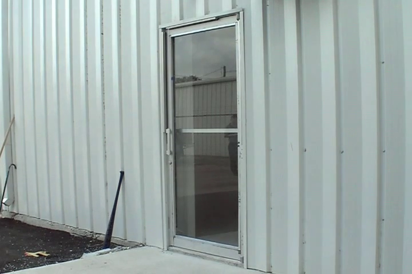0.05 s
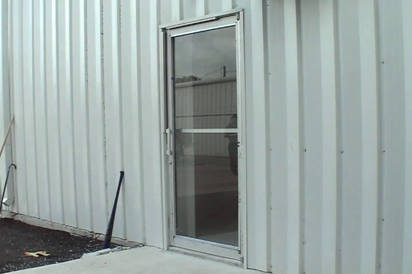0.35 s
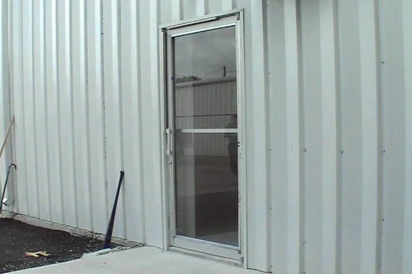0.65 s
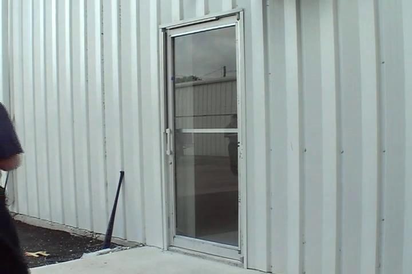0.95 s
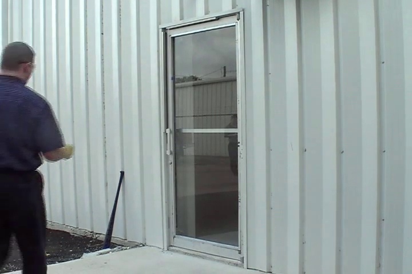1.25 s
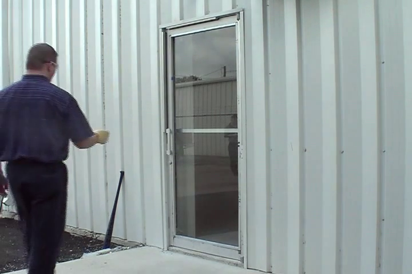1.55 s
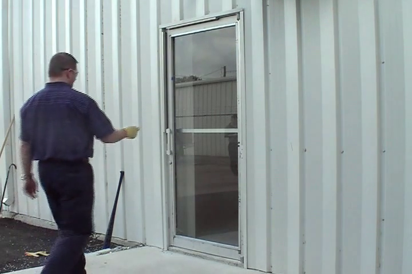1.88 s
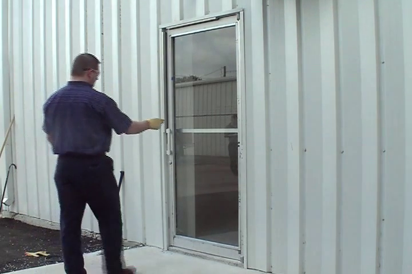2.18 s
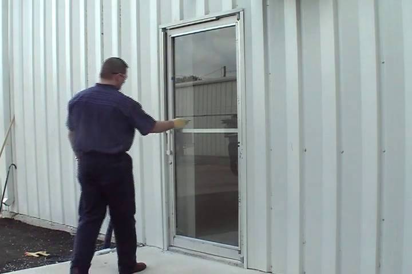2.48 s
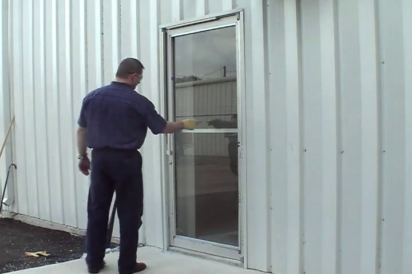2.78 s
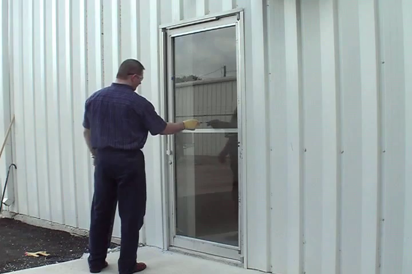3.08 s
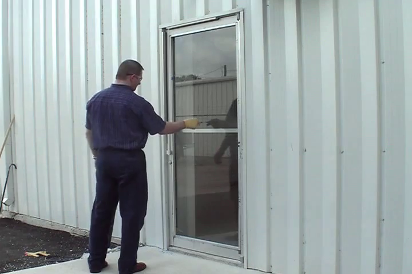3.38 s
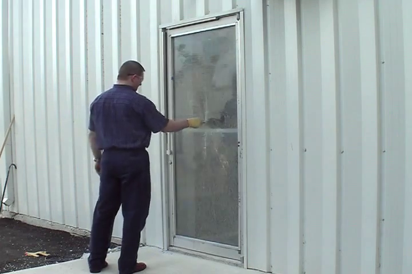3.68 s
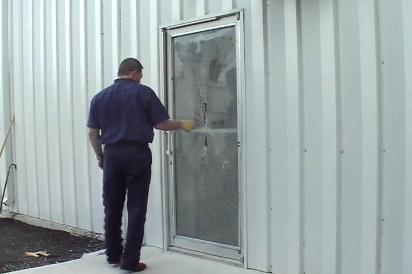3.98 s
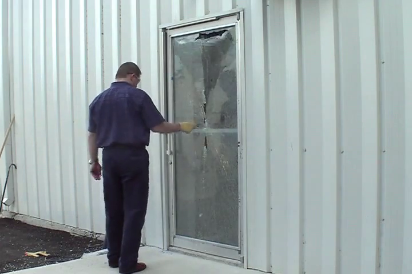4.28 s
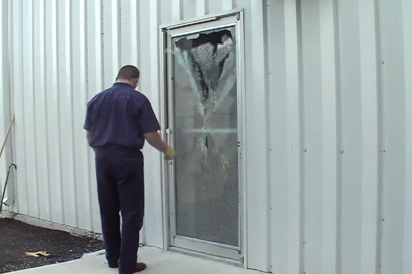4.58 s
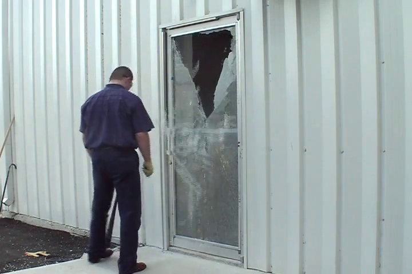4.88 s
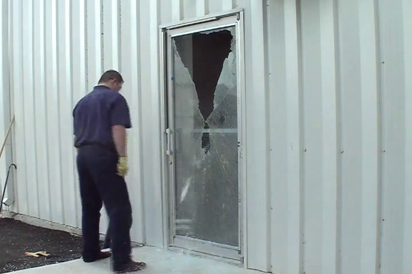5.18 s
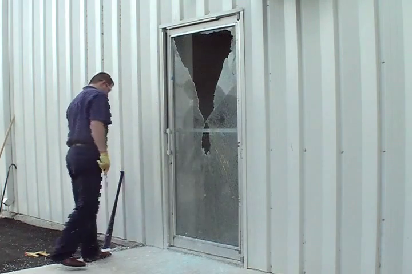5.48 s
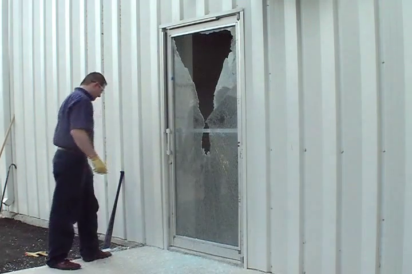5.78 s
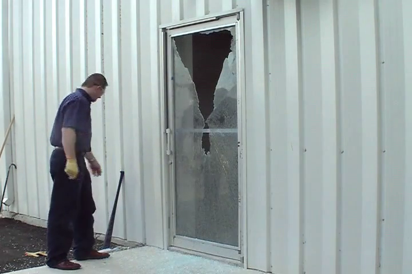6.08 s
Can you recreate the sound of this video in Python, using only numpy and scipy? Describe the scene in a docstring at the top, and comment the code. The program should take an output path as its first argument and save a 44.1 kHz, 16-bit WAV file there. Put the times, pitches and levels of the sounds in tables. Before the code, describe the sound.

Distant traffic and a wavering engine hum faintly in an open yard. Shoes scuff softly on grit, and a tool scratches briefly against a glass door. The pane bursts with a sharp bang that overloads the microphone, the door booming as the cracked glass crackles. Slabs and crumbs then pour onto concrete, clacking and tinkling for about two seconds. A sole slides quietly as the fall thins out.

```python
"""Distant traffic and an engine hum fill a yard. A man walks up to a tempered glass door in a
sheet-metal wall and, at 3.2 s, presses a punch against the pane. At 3.8 s the pane bursts with a
bang that overloads the microphone; the door booms and the cracked glass crackles. Then slabs of
glass crumbs let go and shower onto the concrete, clacking and tinkling. Near 6 s his sole slides
as he steps away."""
import sys
import numpy as np
from scipy import signal
from scipy.fft import rfft, irfft
from scipy.io import wavfile

SR = 44100
rng = np.random.default_rng(int(sys.argv[2]) if len(sys.argv) > 2 else 0)


def master_out(mix):
    """Clip the mix to full scale and print it as 16-bit PCM to the path in sys.argv[1]."""
    frames = np.transpose(np.atleast_2d(mix))
    ceiling = np.clip(frames, -1, 1)
    pcm = np.round(ceiling * 32767).astype(np.int16)
    wavfile.write(sys.argv[1], SR, pcm)


N = 275625
TIME = np.arange(N) / SR
CUTOFF_HZ = 16700


def from_db(db):
    """Turn decibels (dB) into a number to multiply by."""
    return 10 ** (np.asarray(db) / 20)


def gains(rows):
    """Join rows of a time and levels in dB into loudness curves, silent before the first row."""
    times, *columns = np.transpose(rows)
    return [from_db(np.interp(TIME, times, db)) * (TIME >= times[0]) for db in columns]


def drift(turns_per_s):
    """A slow random wobble, about 1 in size."""
    points = rng.standard_normal(4000)
    return np.interp(TIME * turns_per_s, np.arange(len(points)), points) / np.sqrt(2 / 3)


def colour(x, spectrum, size=4096):
    """Make some pitches stronger and others weaker; white noise keeps its power."""
    hz, level_db = np.transpose(spectrum)
    bins = np.maximum(np.arange(size // 2 + 1) * SR / size, 1)
    curve = from_db(np.interp(np.log(bins), np.log(hz), level_db))
    # build the filter so that nothing sounds ahead of a click
    cepstrum = irfft(np.log(curve))
    cepstrum[1:size // 2] *= 2
    cepstrum[size // 2 + 1:] = 0
    pulse = irfft(np.exp(rfft(cepstrum)))
    return signal.oaconvolve(x, pulse / np.linalg.norm(pulse))[:N]


def ring(clicks, hz, ring_s):
    """Each click starts a tone of its own height; the ring time is how long it takes to fade 60 dB."""
    fade, turn = from_db(-60 / (ring_s * SR)), 2 * np.pi * hz / SR
    return signal.lfilter([0, np.sin(turn)], [1, -2 * fade * np.cos(turn), fade * fade], clicks + 1e-18)


def strike_tones(clicks, tones, wander_db=0):
    """Each click strikes each tone with a random strength; wander shifts which tones are favoured."""
    out = 0
    for hz, db, ring_s in tones:
        strength = rng.standard_normal(N) * from_db(db + wander_db * np.minimum(drift(35), 1.5))
        keep_energy = np.sqrt(4 * np.log(1000) / (ring_s * SR))
        out = out + ring(clicks * strength, hz, ring_s) * keep_energy
    return out


def grains(per_s, spread_db):
    """Random clicks of uneven size, with an average power of 1."""
    sizes = from_db(spread_db * np.minimum(rng.exponential(1, N), 3))
    clicks = sizes * rng.choice([-1, 1], N) * (rng.random(N) < per_s / SR)
    return clicks / np.sqrt(np.mean(clicks ** 2) + 1e-20)


def flurries(rows, rise_s=0.00029):
    """A loudness curve of events that swell in a moment and die away; their powers add."""
    power = np.zeros(N)
    for start, db, fade_s in rows:
        at = round(start * SR)
        age = TIME[:min(SR // 4, N - at)]
        shape = (1 - np.exp(-age / rise_s)) * np.exp(-age / fade_s)
        power[at:at + len(age)] += (from_db(db) * shape) ** 2
    return np.sqrt(power)


def pings(rows):
    """Pure tones that start at once and die away."""
    out = np.zeros(N)
    for start, hz, db, ring_s in rows:
        at = round(start * SR)
        age = TIME[:min(int(ring_s * SR), N - at)]
        out[at:at + len(age)] += from_db(db - 60 * age / ring_s) * np.sin(2 * np.pi * hz * age)
    return out


def stereo_noise(spectrum, side_db):
    """Steady noise: a shared part, plus a side part added on the left and taken away on the right."""
    shared, side = (colour(rng.standard_normal(N), spectrum) for _ in range(2))
    return shared + from_db(side_db) * side * [[1], [-1]]


# Tone colours of the traffic and the hiss. Each row: pitch in Hz, relative level in dB.
TRAFFIC_COLOUR = [(20, -16), (40, -13.5), (60, -4), (100, -2.5), (170, -4.5), (250, -9), (350, -10.5),
                  (520, -8), (850, -9.5), (1400, -14), (2500, -21), (4500, -29.5), (7000, -32.5),
                  (16000, -64)]
HISS_COLOUR = [(2000, -19), (5500, -2.5), (7700, -9), (8700, 9), (9400, 6), (11300, -16), (13000, -8),
               (16000, -22)]
# A distant engine changing gear. Each row: time in seconds, pitch in Hz, level in dB.
ENGINE_NOTE = [(0, 123.9, -57), (1.9, 117.4, -54), (2.55, 120.9, -47.5), (3.85, 123.1, -55),
               (4.05, 92, -43.5), (4.5, 93.1, -53.5), (5.02, 107.7, -45.5), (5.2, 110, -68)]
def background():
    """Far traffic rumbles, an engine note wavers and the microphone hisses."""
    times, hz, db = np.transpose(ENGINE_NOTE)
    pitch = np.interp(TIME, times, hz) + 2.54 * drift(6.8)
    loudness = from_db(np.interp(TIME, times, db) + 1.6 * drift(9.8))
    engine = loudness * np.sin(2 * np.pi * np.cumsum(pitch) / SR)
    traffic = from_db(-48.5) * stereo_noise(TRAFFIC_COLOUR, side_db=-15)
    hiss = from_db(-60.5) * stereo_noise(HISS_COLOUR, side_db=1.5)
    return traffic + engine + hiss


def dying_noise(fade_s, channels):
    """A second of fading noise, like many tiny echoes blurred together."""
    age = TIME[:SR]
    noise = rng.standard_normal((channels, SR)) * np.exp(-age / fade_s) * (age > .002)
    return noise / np.linalg.norm(noise, axis=-1, keepdims=True)


# The echo off the building opposite. Each row: delay in seconds, level in dB.
BUILDING_ECHOES = [(0.062, -19)]
def yard(x, tail_db, tail_ring_s, treble_cut_hz, scatter_db, scatter_s):
    """Add an open-air tail, scatter off the ribbed wall that differs at each ear, and an echo."""
    fade_s = tail_ring_s / np.log(1000)
    tail = dying_noise(fade_s, channels=1) + dying_noise(fade_s, channels=2)
    tail = signal.sosfilt(signal.butter(1, treble_cut_hz, fs=SR, output="sos"), tail)
    response = from_db(tail_db) * tail + from_db(scatter_db) * dying_noise(scatter_s, channels=2)
    response[:, 0] += 1  # the direct sound
    for delay, db in BUILDING_ECHOES:
        response[:, round(delay * SR)] += from_db(db)
    return signal.oaconvolve(x, response, axes=-1)[:, :N]


# Shoes scuff grit, heel and sole land, and the punch touches the glass.
# Each row: start in seconds, level in dB, fade time in seconds.
SHOE_SCUFFS = [(1.289, -43, 0.016), (1.68, -53, 0.017), (2.025, -46.5, .01), (2.74, -47, 0.027)]
SHOE_LANDINGS = [(1.28, -42, 0.0091), (1.379, -43, 0.007)]
PUNCH_TOUCHES = [(3.1603, -32, 0.0095), (3.1635, -35.5, 0.015), (3.202, -45, 0.0084)]
# A sole slides on the concrete. Each row: time in seconds, level in dB.
SOLE_SLIDE = [(5.95, -49.5), (6.08, -47), (6.14, -45), (6.2, -44), (6.25, -46)]
# Tone colours of those four sounds. Each row: pitch in Hz, relative level in dB.
SCUFF_COLOUR = [(200, -2), (1200, 3), (2500, 1), (9000, 0), (11000, -6), (16000, -10)]
STEP_COLOUR = [(150, -8), (900, 3), (3500, -5), (6000, -18), (16000, -35)]
PUNCH_COLOUR = [(500, -29), (1900, -18), (2800, -4), (4000, -3), (7000, -5.5), (9000, -16), (16000, -27)]
SLIDE_COLOUR = [(100, -8), (400, -6), (900, -0.5), (1300, -2.5), (2000, -16), (8000, -23)]
def man():
    """His shoes crunch on grit, his punch scratches the pane, and a sole slides as he steps away."""
    grit = grains(per_s=5000, spread_db=2)
    scuffs = colour(flurries(SHOE_SCUFFS) * grit, SCUFF_COLOUR)
    step = colour(flurries(SHOE_LANDINGS) * grit, STEP_COLOUR)
    punch = colour(flurries(PUNCH_TOUCHES) * grains(per_s=14000, spread_db=1.5), PUNCH_COLOUR)
    slide = colour(gains(SOLE_SLIDE)[0] * rng.standard_normal(N), SLIDE_COLOUR)
    return scuffs + step + punch + slide


# The door swings in its frame. Each row: start in seconds, level in dB.
FRAME_KNOCKS = [(3.834, -22.5), (3.896, 1.5)]
# Tones of the door and wall. Each row: pitch in Hz, level in dB, ring time in seconds.
DOOR_TONES = [(55.8, -38.5, 1), (91, -38, 0.8), (116.5, -41, 0.85), (164.7, -44.5, 0.58), (209, -38, 0.3),
              (483, -44, 0.38)]
def door():
    """The stress let out of the glass shakes the frame and the wall sheets, which boom."""
    knocks = np.zeros(N)
    for start, db in FRAME_KNOCKS:
        knocks[round(start * SR)] = from_db(db)
    return sum(from_db(db) * ring(knocks, hz, ring_s) for hz, db, ring_s in DOOR_TONES)


# Loose crumbs: a first fall from the top of the pane, a lull, then the main fall.
# Each row: time in seconds, level of bright crumbs in dB, level of dull clatter in dB.
CRUMB_FLOW = [(4.36, -48.5, -50.5), (4.42, -34.5, -38), (4.68, -31, -37), (4.79, -28.5, -33.5),
              (5.0, -31, -39.5), (5.1, -30.5, -30.5), (5.24, -21.5, -31), (5.55, -29, -31.5),
              (5.72, -35, -42), (6.03, -34, -41), (6.16, -45, -58)]
BREAK_UP_S = 0.01  # fade time of a crumbling lump or slab
def shower(lumps_per_s=60, lump_spread_db=3, trickle_db=-4.5):
    """Bright and dull loudness curves of loose glass: an even trickle with small lumps at random."""
    slots = np.arange(CRUMB_FLOW[0][0], N / SR - .05, 1 / lumps_per_s)
    lateness, size = rng.random((1000, 2))[:len(slots)].T
    starts = slots + lateness / lumps_per_s
    levels = lump_spread_db * (2 * size - 1)
    lumps = flurries((start, db, BREAK_UP_S) for start, db in zip(starts, levels))
    return gains(CRUMB_FLOW) * np.hypot(from_db(trickle_db), lumps)


def tinkle(loudness, count, centre_hz, octaves, level_db, ring_s):
    """Pieces ring at random, more often when the fall is loud, each at a pitch set by its size."""
    chance = np.sqrt(loudness)
    at = rng.choice(N, count, p=chance / chance.sum())
    size, force, damping = rng.standard_normal((count, 3)).T
    hz = np.minimum(centre_hz * 2 ** (octaves * size), CUTOFF_HZ)
    blow_db = np.minimum(20 * np.log10(loudness[at]), -22)  # one piece takes only so much of a blow
    db = blow_db + level_db + 4 * np.minimum(force, 2)
    return pings(zip(at / SR, hz, db, ring_s * 2 ** (.5 * damping)))


# Tone colour of a crumb's tick. Each row: pitch in Hz, relative level in dB.
TICK_COLOUR = [(500, -16.5), (2500, -11.5), (4000, -6.5), (4700, -6), (6500, -3.5), (8000, 1), (9500, -1.5),
               (11300, -10.5), (16000, -21)]
# High ringing tones that colour each tick of falling glass.
# Each row: pitch in Hz, level in dB, ring time in seconds.
HIGH_RING_TONES = [(7380, -15, .04), (7810, -11, .035), (8650, -13, .03), (9110, -7, .05),
                   (9570, -12, .045), (10020, -17, .04), (13000, -24, .025)]
def crumbs(clicks, tick_db):
    """Little glass cubes tick at each contact, and a high ring colours each tick."""
    ticks = from_db(tick_db) * colour(clicks, TICK_COLOUR)
    return ticks + from_db(-2.5) * strike_tones(clicks, HIGH_RING_TONES, wander_db=4)


# Tone colour of a clack. Each row: pitch in Hz, relative level in dB.
CLACK_COLOUR = [(60, -25.5), (600, -15.5), (1100, -2), (1800, 3), (3500, 0.5), (4500, 0.5), (16000, -10)]
# Tones of a slab hitting the step. Each row: pitch in Hz, level in dB, ring time in seconds.
SLAB_TONES = [(1717, -8.5, 0.01), (2615, -14, 0.019), (2960, -10.5, 0.008), (3200, -16, 0.052),
              (4080, -14, 0.034)]
def clacks(knocks):
    """Bigger pieces land with a dull knock and a short ring."""
    hits = from_db(-3) * colour(knocks, CLACK_COLOUR)
    return hits + from_db(-2.5) * strike_tones(knocks, SLAB_TONES, wander_db=6.5)


# Slabs that snap off or land and break up, and pieces that land whole with one sharp hit.
# Each row: start in seconds, level of the bright part in dB, level of the dull clack in dB.
BREAKING_SLABS = [(3.895, -30, -25), (3.917, -36, -22), (4.081, -45, -25.5), (4.1153, -26.5, -17),
                  (4.284, -35, -35), (4.36, -21, -29.5), (4.3793, -19.5, -17), (4.4078, -18.5, -16.5),
                  (4.4636, -17, -23), (4.5196, -14, -27.5), (4.561, -16, -30.5), (4.575, -15.5, -23.5),
                  (4.634, -16, -24), (4.6938, -11, -18.5), (4.7507, -12, -29), (4.795, -16, -31),
                  (4.8755, -20, -28), (4.97, -29, -24), (5.026, -19.5, -17.5), (5.148, -16, -19.5),
                  (5.179, -14.5, -19.5), (5.2861, -23.5, -14), (5.3327, -15, -24.5), (5.4305, -15, -29),
                  (5.461, -16, -27), (5.5003, -13, -26), (5.522, -19.5, -21.5), (5.5579, -18.5, -21),
                  (5.589, -14, -25.5), (5.7428, -19.5, -35.5), (5.827, -19.5, -31.5), (5.8849, -13, -25.5),
                  (5.9755, -22, -28.5), (6.036, -25, -37.5)]
WHOLE_PIECES = [(4.545, -10, -28), (5.042, -8, -1), (5.662, -9, -26.5), (5.8748, -9.5, -26),
                (6.003, -17, -37), (6.1862, -15.5, -30.5)]
# Single shards ring out. Each row: start in seconds, pitch in Hz, level in dB, ring time in seconds.
SHARD_RINGS = [(4.757, 9000, -22, 0.16), (5.464, 9101, -14, 0.078), (5.935, 8498, -50, 0.2),
               (6.205, 9273, -38.5, 0.78)]
def falling_glass(sharp_hit_s=.0028):
    """Each slab clacks and breaks into a flurry of crumbs; loose crumbs rain down in between."""
    hits = [(*row, BREAK_UP_S) for row in BREAKING_SLABS] + [(*row, sharp_hit_s) for row in WHOLE_PIECES]
    bright = flurries((start, db, fade_s) for start, db, _, fade_s in hits)
    dull = flurries((start, db, fade_s) for start, _, db, fade_s in hits)
    loose_bright, loose_dull = shower()
    # hard landings ring more, and tick less, than the trickle
    landings = crumbs(bright * grains(per_s=6000, spread_db=2.5), tick_db=-3)
    trickle = from_db(-1) * crumbs(loose_bright * grains(per_s=3000, spread_db=3.2), tick_db=3)
    knocks = dull * grains(per_s=7000, spread_db=2) + loose_dull * grains(per_s=2500, spread_db=2.5)
    clatter = clacks(knocks)
    all_bright, all_dull = np.hypot(bright, loose_bright), np.hypot(dull, loose_dull)
    small = tinkle(all_bright, count=300, centre_hz=8600, octaves=.16, level_db=-5.5, ring_s=.06)
    large = tinkle(all_dull, count=300, centre_hz=2900, octaves=.5, level_db=-4, ring_s=.035)
    return landings + trickle + clatter + small + large + pings(SHARD_RINGS)


# The pane lets go. Each row: start in seconds, level in dB, fade time in seconds.
PANE_BURST = [(3.8322, -17, 0.0017), (3.8343, 3, 0.0063)]
# Cracking dies out in a quick rush and a slow settling. Each row: first level in dB, dB lost a second.
CRACKLE_STAGES = [(-27, 117), (-32, 31)]
# Tone colours of the bang and the crackle. Each row: pitch in Hz, relative level in dB.
BANG_COLOUR = [(100, -30.5), (450, -43.5), (950, 4.5), (1600, 5.5), (2600, 5), (3400, -2), (5000, -2),
               (8800, 0.5), (11000, -9.5), (16000, -32)]
CRACKLE_COLOUR = [(150, -2.5), (550, -6.5), (750, -2), (1800, -5), (2600, -1), (4700, -9), (8000, -5),
                  (11000, -12.5), (16000, -25)]
# Tones of the framed pane. Each row: pitch in Hz, level in dB, ring time in seconds.
PANE_TONES = [(735, -19.5, 0.081), (1040, -12, 0.064), (1583, -2.5, 0.029), (1900, -9, 0.11)]
def bursting_pane():
    """Cracks race across the pane within milliseconds, then thin out to a crackle."""
    bang = flurries(PANE_BURST) * grains(per_s=18000, spread_db=-2.5)
    let_go = PANE_BURST[-1][0]
    age = TIME - let_go
    power = sum(from_db(db - fall * np.abs(age)) ** 2 for db, fall in CRACKLE_STAGES) * (age > 0)
    crackle = np.sqrt(power) * grains(per_s=5500, spread_db=3)
    cracks = from_db(-1) * colour(bang, BANG_COLOUR) + from_db(3) * colour(crackle, CRACKLE_COLOUR)
    # the released stress sets the pane ringing, and so does each later crack
    kick = pings((let_go, hz, db - .5, ring_s) for hz, db, ring_s in PANE_TONES)
    return cracks + kick + from_db(-7.5) * strike_tones(crackle, PANE_TONES)


def scene():
    """The action at the door echoes round the yard; the right channel is the louder."""
    pane = bursting_pane() * from_db([[-1], [.8]])
    others = (door() + falling_glass() + man()) * from_db([[-3.1], [1.4]])
    near = yard(pane + others, tail_db=-16, tail_ring_s=.8, treble_cut_hz=7000,
                scatter_db=-10, scatter_s=.004)
    return near + background() * from_db([[-3.2], [2.3]])


def limiter(x, threshold_db, attack_s, release_db_per_s):
    """Turn the volume down a few milliseconds after a peak, then let it come back."""
    over_db = np.maximum(20 * np.log10(np.abs(x).max(axis=0) + 1e-9) - threshold_db, 0)
    recovery_db = release_db_per_s * TIME
    held_db = np.maximum.accumulate(over_db + recovery_db) - recovery_db
    lag = np.exp(-1 / (attack_s * SR))
    return x * from_db(-signal.lfilter([1 - lag], [1, -lag], held_db))


def record(dry):
    """The limiter is too slow for the bang, which overloads; the highest treble is cut."""
    limited = limiter(dry, threshold_db=0.5, attack_s=0.0085, release_db_per_s=225)
    ceiling = .62
    clipped = limited / (1 + (limited / ceiling) ** 4) ** (1 / 4)
    return signal.sosfilt(signal.cheby2(20, 70, CUTOFF_HZ, fs=SR, output="sos"), clipped)


dry = scene()
out = record(dry)
master_out(out)
```